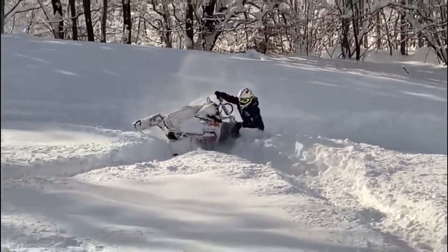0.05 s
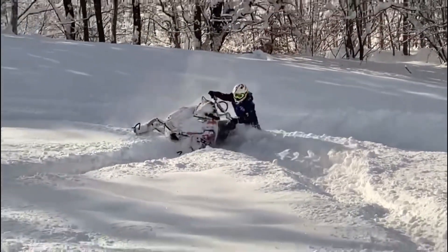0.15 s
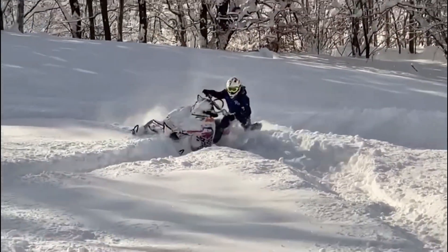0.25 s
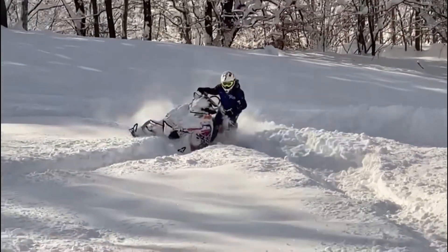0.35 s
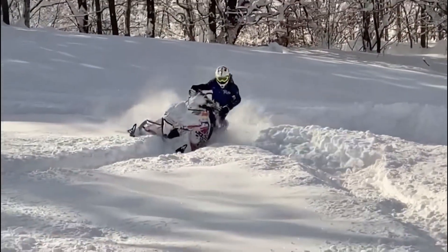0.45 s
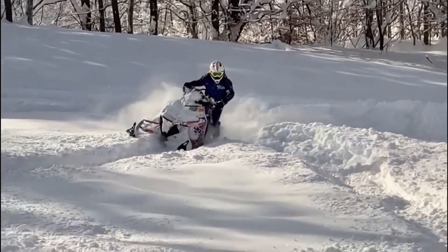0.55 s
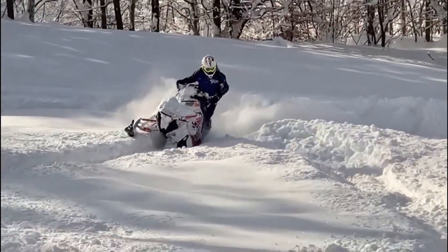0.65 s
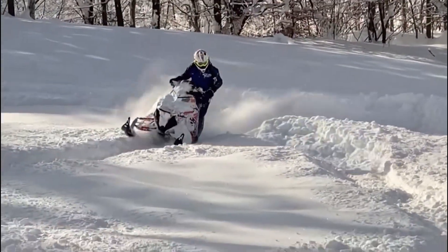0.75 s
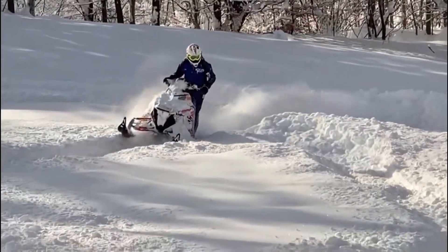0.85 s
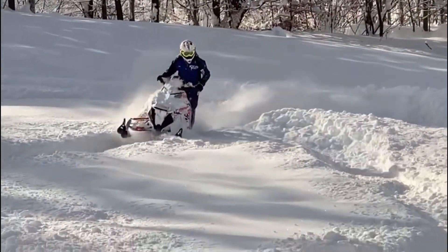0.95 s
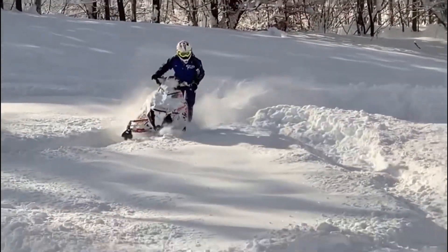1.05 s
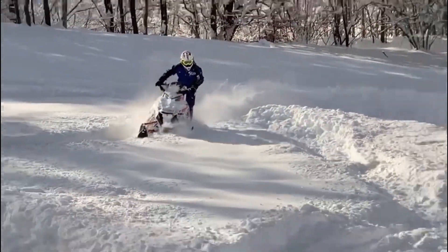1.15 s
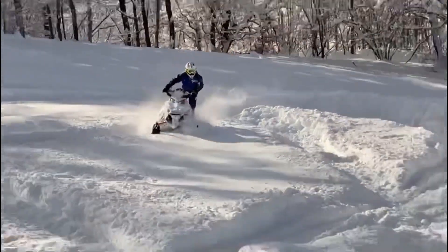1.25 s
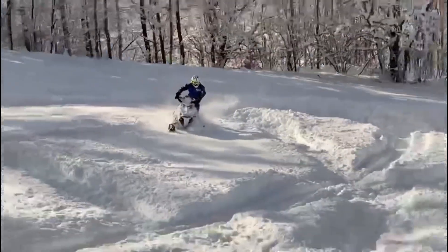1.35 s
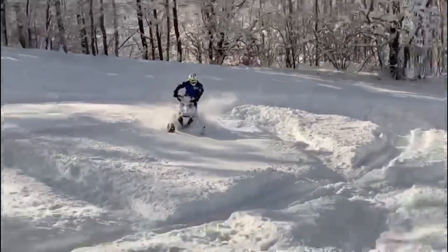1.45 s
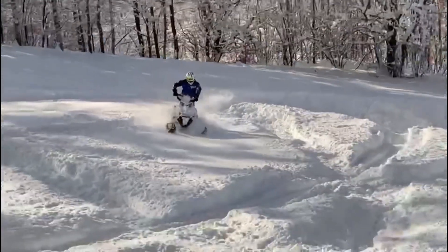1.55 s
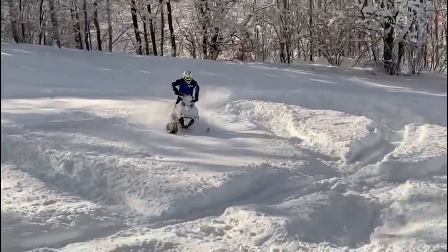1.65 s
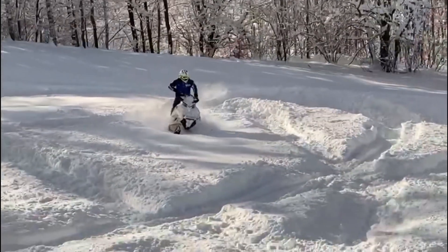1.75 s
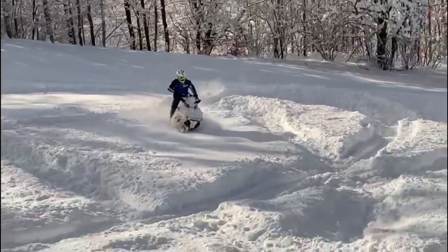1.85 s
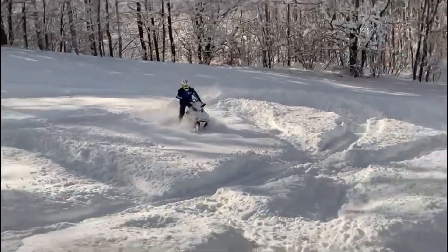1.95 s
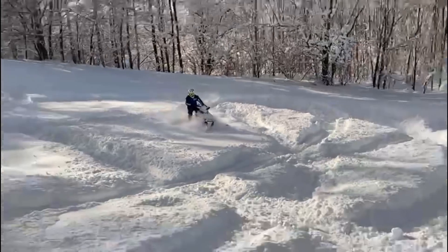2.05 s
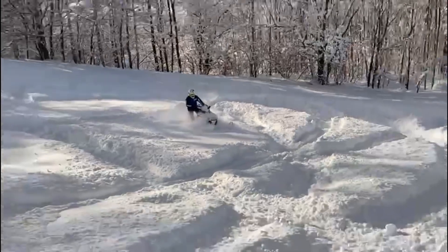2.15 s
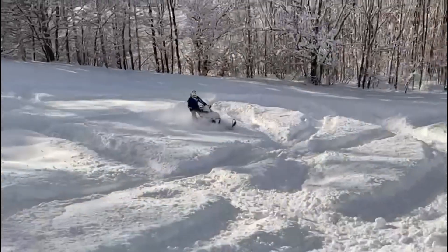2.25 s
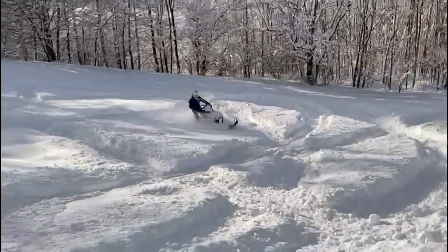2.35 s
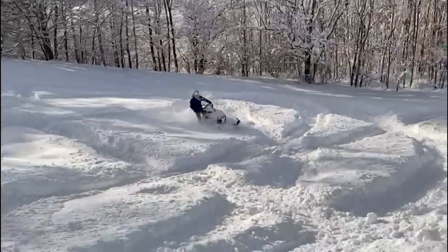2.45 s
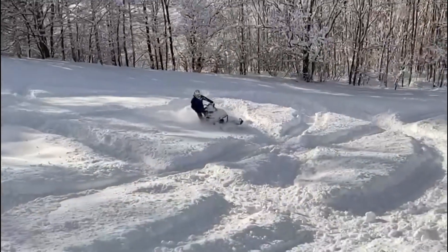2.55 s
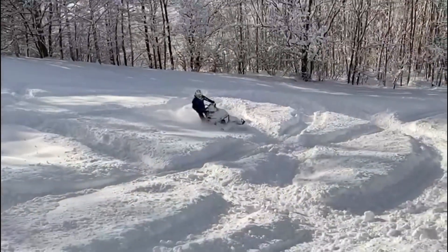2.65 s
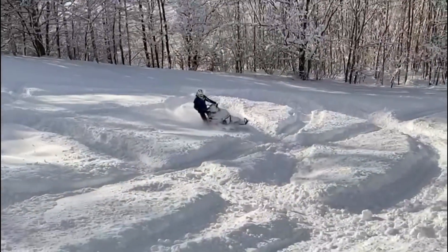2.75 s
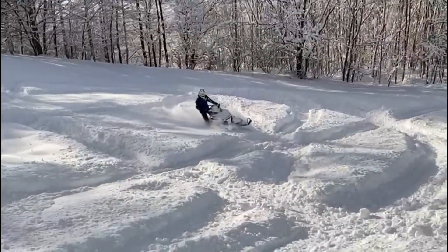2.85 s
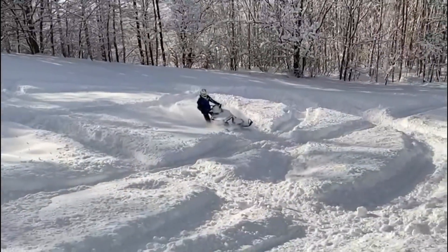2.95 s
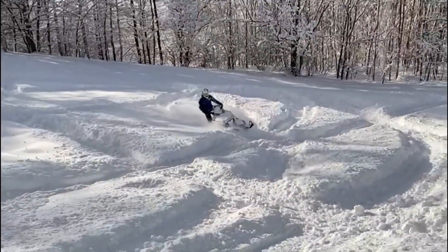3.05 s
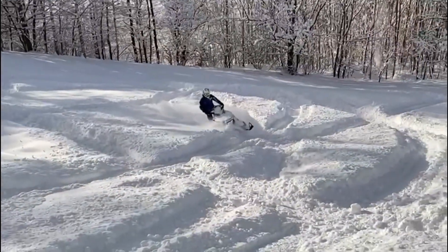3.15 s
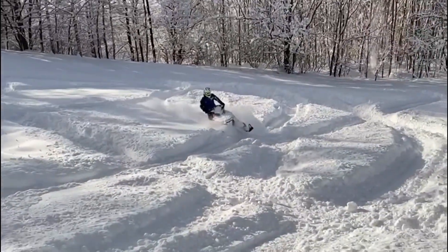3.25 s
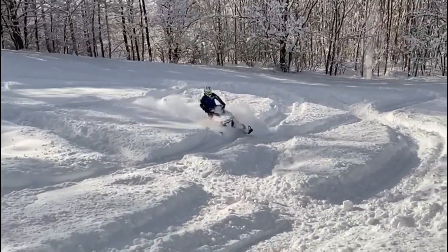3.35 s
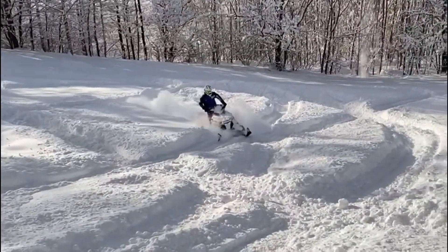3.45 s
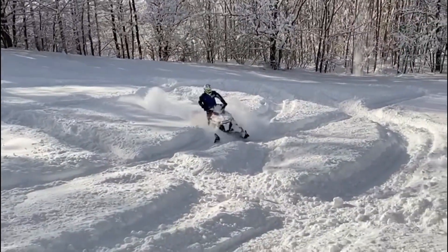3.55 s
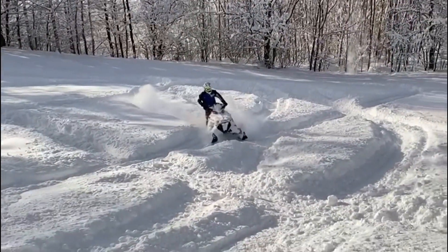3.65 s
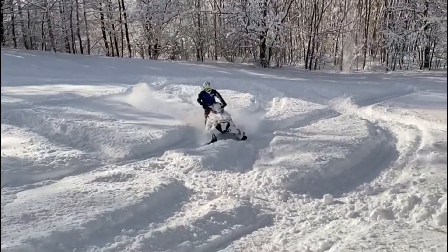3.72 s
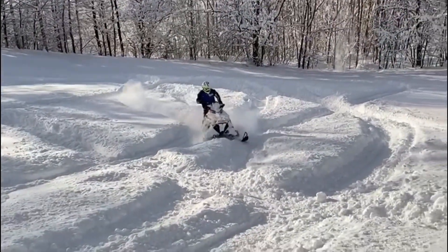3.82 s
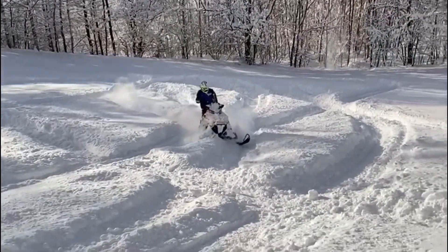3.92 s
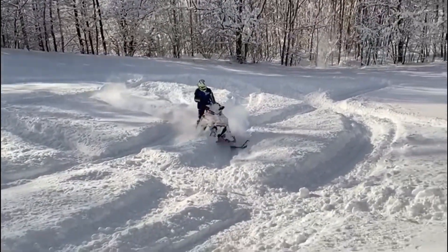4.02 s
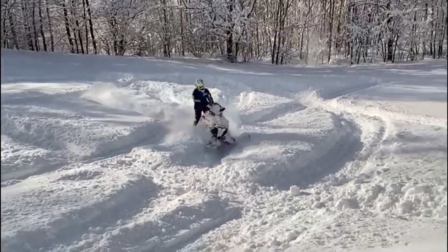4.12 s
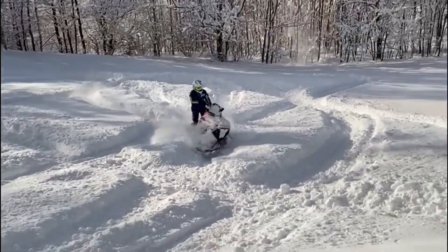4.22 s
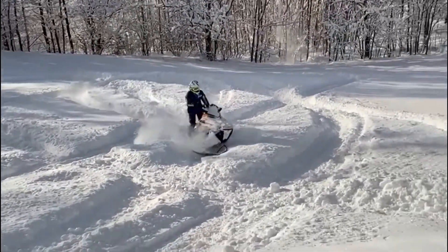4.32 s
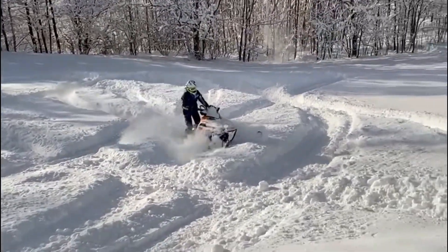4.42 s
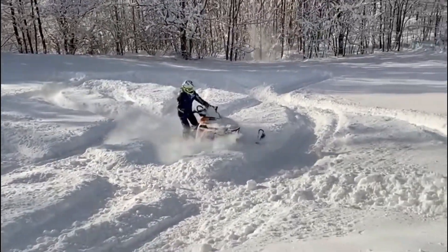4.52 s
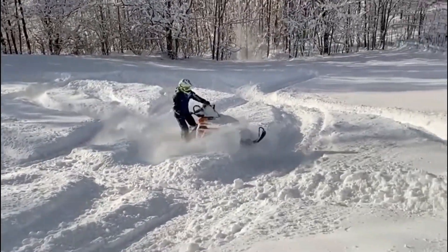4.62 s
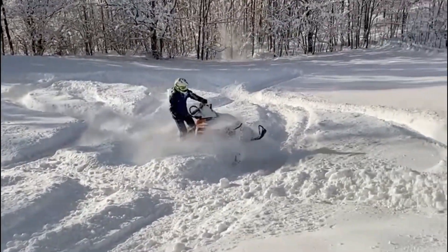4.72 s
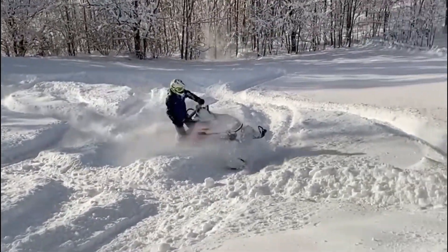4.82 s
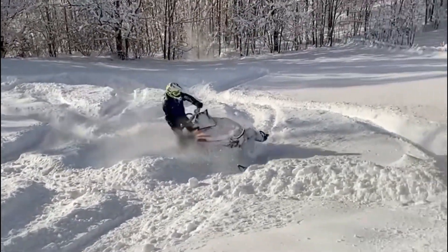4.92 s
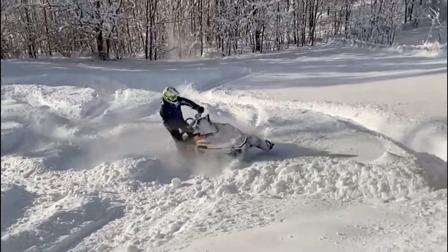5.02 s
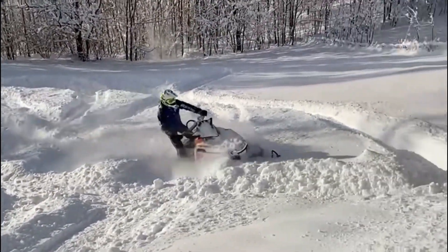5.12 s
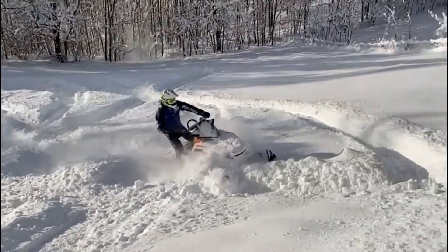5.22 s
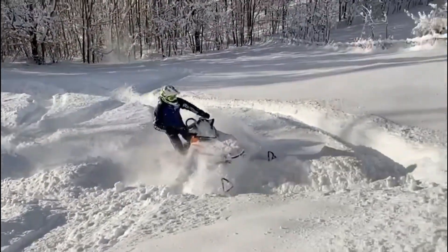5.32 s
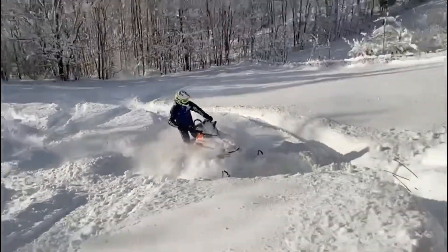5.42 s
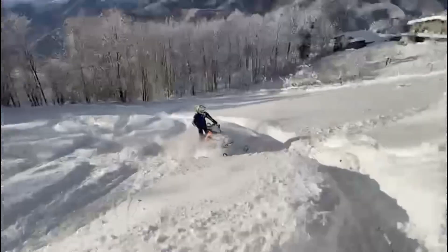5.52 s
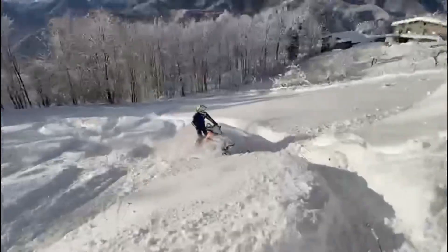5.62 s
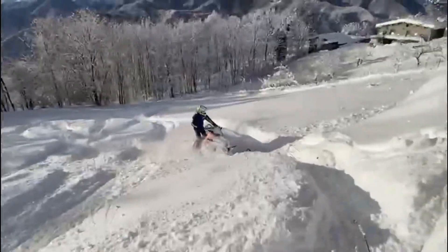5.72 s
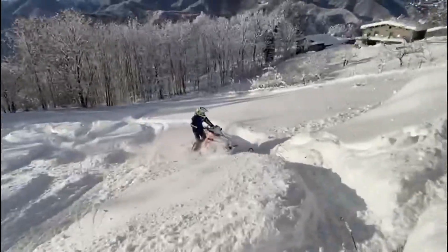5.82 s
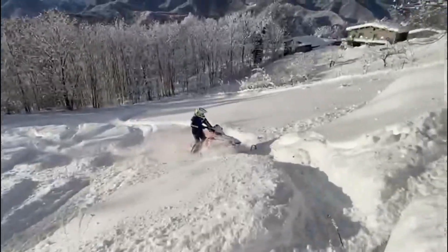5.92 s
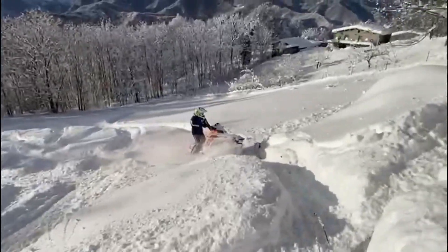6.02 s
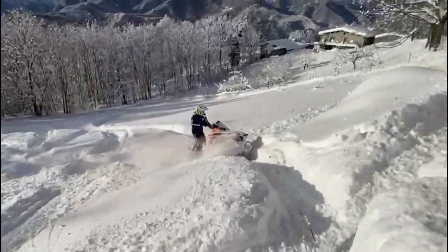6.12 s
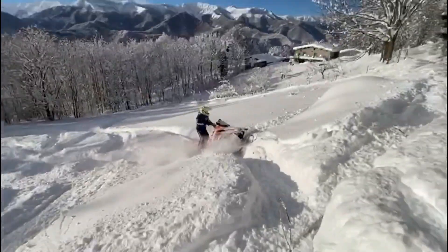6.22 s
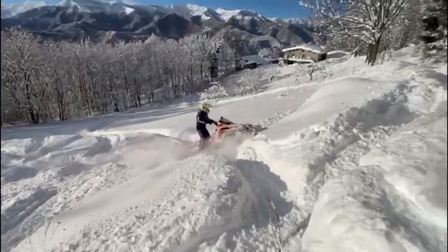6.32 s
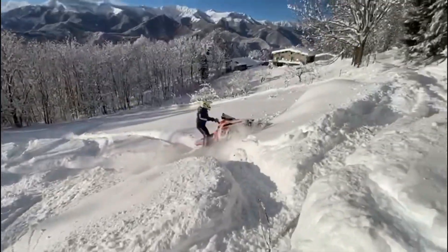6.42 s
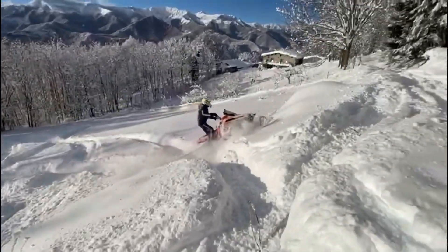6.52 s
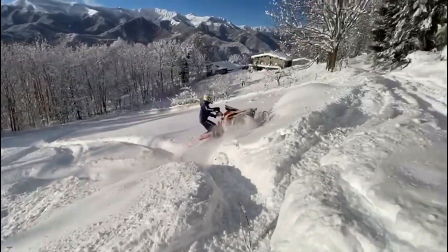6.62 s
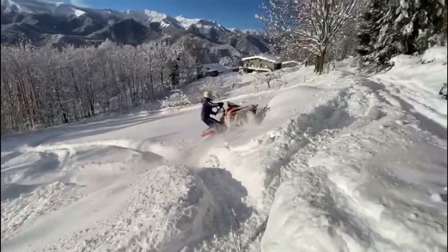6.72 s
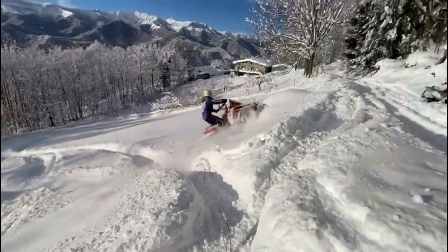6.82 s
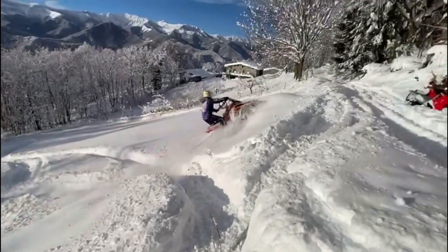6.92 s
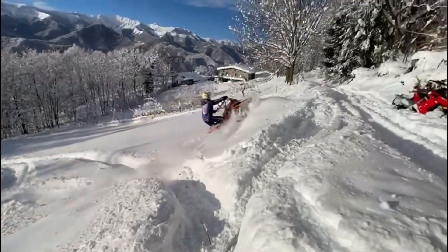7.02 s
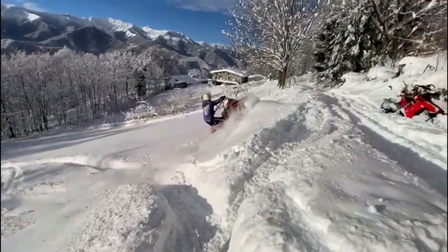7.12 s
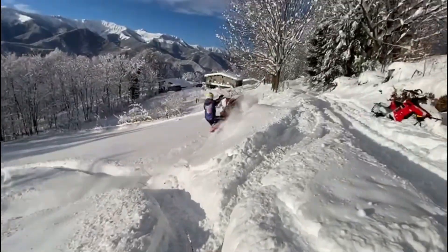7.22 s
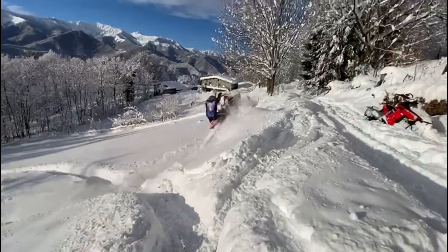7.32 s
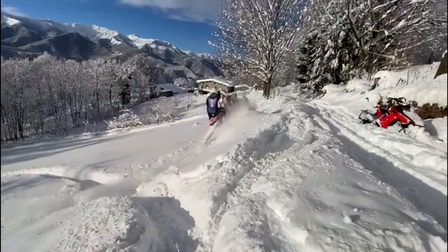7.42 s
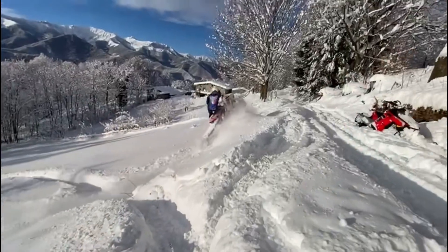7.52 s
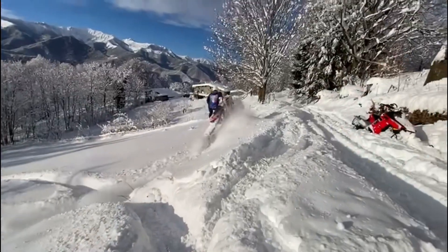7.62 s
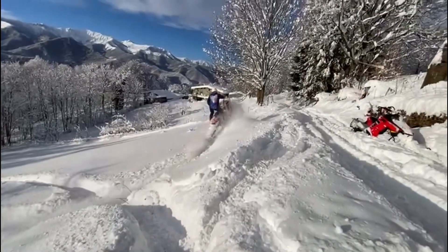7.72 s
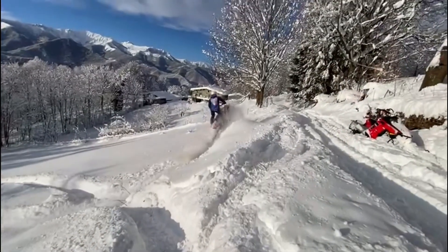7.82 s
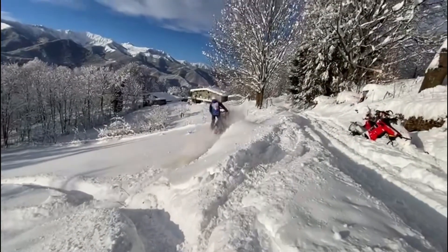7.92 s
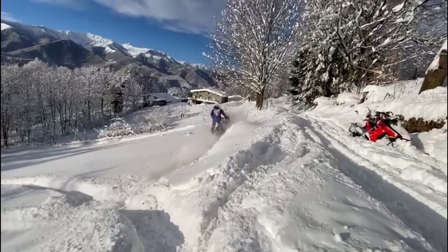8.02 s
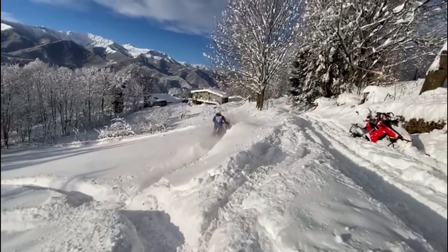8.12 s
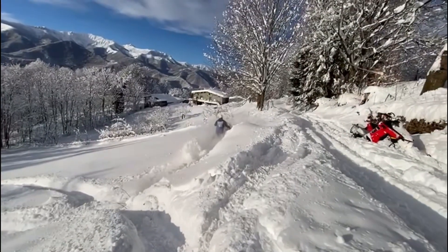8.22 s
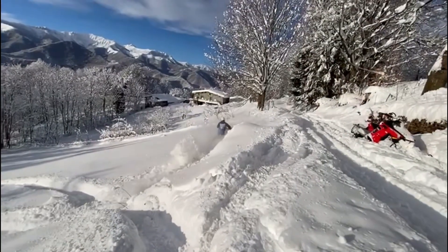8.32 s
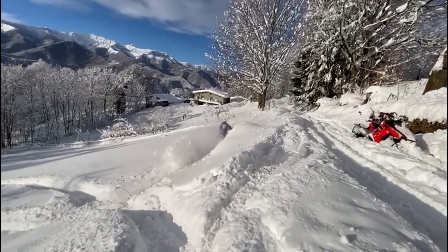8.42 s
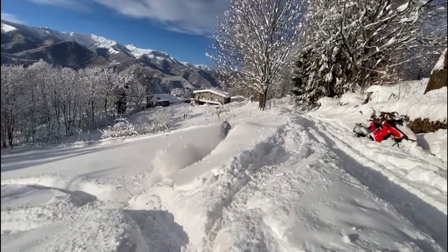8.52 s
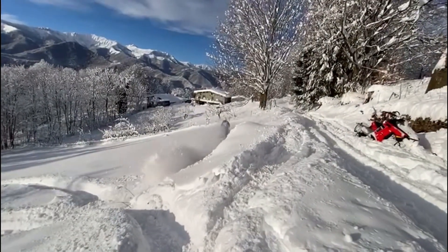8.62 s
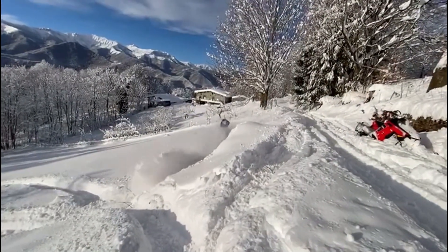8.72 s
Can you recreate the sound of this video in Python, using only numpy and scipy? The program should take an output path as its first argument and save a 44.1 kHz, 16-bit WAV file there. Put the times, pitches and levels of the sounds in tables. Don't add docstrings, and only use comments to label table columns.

```python
import sys
import numpy as np
from scipy import signal
from scipy.fft import rfft, irfft, next_fast_len
from scipy.io import wavfile
from scipy.ndimage import uniform_filter1d, map_coordinates

SR = 44100
rng = np.random.default_rng(int(sys.argv[2]) if len(sys.argv) > 2 else 0)


def nominal_scale(level):
    x = np.asarray(level, float) / 20
    return 10 ** x


def int16_out(signal):
    q = np.round(np.clip(np.atleast_2d(signal).T, -1, 1) * 32767)
    wavfile.write(sys.argv[1], SR, q.astype(np.int16))


N = 386316


def along(points, hz):
    f, v = np.transpose(points)
    return np.interp(np.log(hz + 1), np.log(f + 1), v)


def curves(rows, step=1):
    s, *cols = np.transpose(rows)
    return [np.interp(np.arange(0, N, step) / SR, s, c) for c in cols]


def wobble(rate, step=1):
    knots = rng.standard_normal(4000)
    return map_coordinates(knots, [np.arange(0, N, step) * rate / SR])


def filtered(x, response):
    m = next_fast_len(N + 8192)
    return irfft(rfft(x, m) * response(np.fft.rfftfreq(m, 1 / SR)), m)[..., :N]


def blurred(z, size):
    return uniform_filter1d(uniform_filter1d(z, size[0], axis=-2), size[1], axis=-1)


def noise(spectrum, patchy_db):
    z = signal.stft(rng.standard_normal((2, N)), nperseg=512)[2]
    field = blurred(rng.standard_normal(z.shape[1:]), size=(5, 14))
    x = signal.istft(z * nominal_scale(patchy_db * field / field.std()), nperseg=512)[1][:, :N]
    ends = [(0.9, -120)] + list(spectrum) + [(13000, -120)]
    x = filtered(x, lambda hz: nominal_scale(along(ends, hz)))
    return x / x.std()


# (frequency [Hz], density [dB per Hz])
BREEZE_SPECTRUM = [(20, 4), (35, 25), (60, -6), (110, -27), (160, -120)]
# (time [s], half length [s], gain [dB])
GUSTS = [
    (1.701, .2, 5),
    (4.195, .3, 2),
    (5.25, .25, 2),
    (6.7, .3, 3),
]


def breeze():
    t = np.arange(N) / SR
    gust_db = sum(db * np.exp(-((t - s) / half) ** 2) for s, half, db in GUSTS)
    level_db = -68 + gust_db + 3 * np.array([wobble(3), wobble(3)])
    return nominal_scale(level_db) * noise(BREEZE_SPECTRUM, patchy_db=2.0)


# (time [s], frequency [Hz], level [dB], decay time t60 [s])
BODY_THUMP = (1.681, 78, -29, .05)


def thump():
    s, hz, db, t60 = BODY_THUMP
    t = np.maximum(np.arange(N) / SR - s, 0)
    return nominal_scale(db - 60 * t / t60) * np.sin(2 * np.pi * hz * t)


# (time [s], level [dB])
RIDGE_ECHO = [(0, -60), (7.6, -60), (8, -15), (8.15, -24), (8.3, -12), (8.5, -11), (8.76, -22)]


def hill(x):
    t = np.arange(SR) / SR
    build_up = np.clip((t - .06) / 0.21, 0, 1)
    tail = rng.standard_normal((2, SR)) * nominal_scale(-60 * t / 0.94) * build_up
    trees = nominal_scale(-18) * signal.fftconvolve(x[None], tail / np.linalg.norm(tail[0]), axes=1)[:, :N]
    delayed = np.pad(x, (round(.7 * SR), 0))[:N]
    ridge = nominal_scale(curves(RIDGE_ECHO)[0] + 2.5 * wobble(12)) * delayed
    trees = filtered(trees, lambda hz: 1 / (1 + (hz / 600) ** 2))
    return trees + filtered(ridge, lambda hz: [[1], [0]] / (1 + (hz / 1100) ** 2))


# (time [s], striking rate [Hz], level [dB])
LUG_RATE = [
    (7.5, 154.3, -88),
    (7.8, 192, -47),
    (8.04, 165.8, -41),
    (8.17, 139, -45),
    (8.3, 93.4, -52),
]


def lugs():
    hz, db = curves(LUG_RATE)
    return nominal_scale(db + 2.2 * wobble(24)) * np.sin(2 * np.pi * np.cumsum(hz) / SR + .5 * wobble(23))


# (frequency [Hz], density [dB per Hz])
RUMBLE_SPECTRUM = [(13, -81), (22, -32), (59, -15), (108, -11.5), (134, -20), (200, -10), (260, -7),
                   (440, -120)]
ROAR_SPECTRUM = [(150, -26), (300, -2.5), (700, -2.5), (1500, -0.5), (1850, -1), (2080, -5), (2500, -5.5),
                 (3500, -14), (5500, -19.5), (8000, -32)]
HISS_SPECTRUM = [(3000, 5.5), (4500, 2), (6500, -2), (8000, 5.5), (10000, -10), (11500, -11)]
# (time [s], boom [dB], octave [dB])
LOAD = [(0, -30.5, 0.5), (.32, -41.5, 5.5), (.7, -37.5, 0.5), (1.1, -32, 6), (1.25, -33, 5),
        (1.5, -39.5, 1.5), (1.7, -37.5, -5), (2, -35.5, 3.5), (2.95, -39.5, -6), (3.3, -37.5, -5),
        (3.68, -24.5, 7), (4.1, -25.5, -1), (4.39, -29, 4), (4.68, -25, 6.5), (5.05, -30.5, -2),
        (5.18, -15.5, 8), (5.32, -26.5, -1), (5.55, -19, 1.5), (5.95, -16.5, 0.5), (6.22, -28.5, -9.5),
        (6.78, -29.5, 5), (7.35, -23.5, -3), (7.81, -38, 12), (8.15, -37.5, 5.5), (8.45, -48, -2),
        (8.76, -73, 5)]
# (time [s], spray [dB], dig [dB])
SPRAY = [(0, -55.5, 10), (.22, -52.5, 6), (.7, -58.5, 4), (1.5, -60.5, 4), (1.93, -54, -2),
         (2.66, -52, 6.5), (3.679, -47.5, 4.5), (4.39, -53.5, 6.5), (4.66, -42.5, 8), (4.95, -40.5, 9.5),
         (5.1, -40, 7), (5.23, -39.5, 13.5), (5.36, -44.5, 7.5), (5.56, -35.5, 10), (5.9, -33.5, 7),
         (6.1, -34.5, 11.5), (6.3, -48, 11), (6.61, -43, 5), (7.3, -42.5, -0.5), (7.55, -42.5, -6),
         (8.171, -44.5, 11.5), (8.76, -59.5, -29.5)]
# (time [s], gain [dB])
ROAR_GAIN = [(0, -1), (.55, -3), (.8, -1), (1.2, 0), (1.7, 0), (2, -2), (2.3, -3.5), (3.6, -3.5), (4, -1.5),
             (5.3, -1.5), (5.5, -3.5), (6.3, -3.5), (6.7, -1.5), (7.3, 0), (7.9, 0), (8.12, -5), (8.3, -2),
             (8.65, -5)]
# (time [s], clear share [0-1])
CLEAR = [(0, .8), (.09, .6), (.2, 0), (.77, 0), (.8, 1), (1.13, 1), (1.17, 0), (4.2, 0), (4.28, 1),
         (4.35, 1), (4.4, 0), (6.05, 0), (6.15, .3), (6.4, 0), (6.6, .3), (7.2, .4), (7.4, 1), (7.85, .8),
         (8.15, .6), (8.25, .2)]
# (time [s], level [dB])
POPS = [
    (.8, -33),
    (.915, -31),
    (.96, -30),
    (4.185, -31),
    (4.225, -33),
    (7.388, -31),
    (7.46, -32),
    (7.55, -36),
    (8.02, -44),
]


def track(phase):
    (load_db, _), (spray_db, dig_db) = curves(LOAD), curves(SPRAY)
    (clear,), (roar_gain_db,) = curves(CLEAR), curves(ROAR_GAIN)
    sag, lift_db = speed()[1], barks()[0]

    rumble_db = -42.0 + 0.35 * (load_db + 22.5) + 0.38 * (spray_db + 44.0) + .5 * dig_db
    rumble_db -= .06 * sag
    rumble = nominal_scale(rumble_db + 1.4 * wobble(9.7)) * noise(RUMBLE_SPECTRUM, patchy_db=1.3)

    roar_db = -36 + 0.57 * (spray_db + 49.5) + 0.41 * lift_db + 0.28 * dig_db - 0.094 * sag
    roar_db += roar_gain_db - 3 * clear
    puff = 1 + 0.043 * np.cos(phase) + 0.14 * np.cos(phase / 2)
    gas = noise(ROAR_SPECTRUM, patchy_db=1.1)
    dull = filtered(gas, lambda hz: 1 / (1 + (hz / 1400) ** 4))
    churned = gas - np.maximum(.8 * clear, lift_db / 45) * (gas - dull)
    roar = nominal_scale(roar_db - 2.5 + .9 * wobble(20)) * puff * churned

    t = np.arange(N) / SR
    pops = sum(nominal_scale(db) * np.exp(-((t - s) / .016) ** 2) for s, db in POPS)
    bursts = pops * filtered(gas, lambda hz: 1 + (hz / 4500) ** 2 * (hz < 7500))

    hiss_db = spray_db + 0.55 * lift_db * clear - 0.17 * sag
    hiss = nominal_scale(hiss_db + 5.5 + 1.5 * wobble(9)) * (1 + 0.1 * np.cos(phase))
    hiss = hiss * noise(HISS_SPECTRUM, patchy_db=2.0)
    return rumble + roar + bursts + hiss


# (time [s], rate [Hz])
HELD_RATE = [(0, 253.7), (.5, 256.5), (.8, 257.5), (1.1, 260.4), (1.3, 231.1), (2.07, 241.7), (2.52, 255.7),
             (4.17, 253.9), (4.42, 249), (4.68, 250.2), (5.07, 245.9), (5.72, 249.8), (6.45, 248),
             (6.65, 251.8), (7.41, 250.9), (7.6, 256.9), (7.88, 255), (8.17, 236.1)]
# (start [s], lowest point [s], lowest rate [Hz], recovery [s])
SAGS = [
    (0.167, 0.315, 250.5, 0.17),
    (1.129, 1.391, 187, 0.12),
    (1.621, 1.742, 194, 0.15),
    (4.709, 4.824, 233.5, 0.57),
    (5.091, 5.289, 156.4, 0.19),
    (5.737, 5.836, 242, 0.2),
    (6.721, 7.177, 240, 0.12),
    (8.194, 8.414, 148.2, 0.18),
]


def speed():
    fall_power, rise_power = 1.9, 1.7
    inertia = round(.045 * SR)
    held, = curves(HELD_RATE)
    hz, t = held, np.arange(N) / SR
    for start, low, low_hz, back in SAGS:
        fall = 1 - (1 - np.clip((t - start) / (low - start), 0, 1)) ** fall_power
        recovery = np.exp(-(np.maximum(t - low, 0) / back) ** rise_power)
        hz = hz - (np.interp(low, t, hz) - low_hz) * fall * recovery
    hz = uniform_filter1d(hz, size=inertia)
    climbing = uniform_filter1d(np.clip(np.gradient(hz) * SR / 250, 0, 1), size=inertia)
    return hz, np.maximum(held - hz, 0) * (1 - .6 * climbing)


def crank():
    flutter = .01 * wobble(90) + .035 * wobble(20)
    return 2 * np.pi * np.cumsum(speed()[0]) / SR + flutter


# (time [s], hold [s], lift [dB], outlet resonance [Hz], share reaching the boom [0-1])
BARKS = [(0, 0.065, 13, 825, 0), (0.093, 0.03, 9.5, 890, 0.63), (0.184, 0.018, 7.5, 830, 0.6),
         (0.813, 0.072, 24, 967, 0.45), (0.862, 0.12, 26, 1000, 0.3), (1.002, 0.14, 22, 1090, 0.06),
         (1.547, 0.11, 4.5, 1140, 1), (3.713, 0.15, 8.5, 760, 0), (3.812, 0.07, 22.5, 754, 0.1),
         (3.934, 0.022, 8, 690, 0.22), (4.153, 0.071, 23.5, 920, 0.2), (4.24, 0.066, 17, 1000, 0.18),
         (4.763, 0.16, 12.5, 1120, 0.98), (5.474, 0.12, 7.5, 1300, 0.23), (6.103, 0.12, 12.5, 735, 0.83),
         (6.378, 0.062, 4.5, 902, 0.74), (6.652, 0.047, 4.5, 851, 0.02), (6.887, 0.42, 0, 774.4, 0.23),
         (7.431, 0.026, 9.5, 730, 0.25), (7.476, 0.18, 7.5, 1106, 0.2), (8.656, 0.23, 27.5, 990, 0.97)]
# (time [s], half length [s], loss [dB])
SMOTHERS = [
    (.072, 0.011, 4),
    (0.15, 0.03, 6),
    (0.245, 0.018, 6),
    (.37, 0.017, 3),
    (3.905, 0.0099, 4),
    (4.872, 0.013, 5),
    (5.01, .015, 2.5),
    (7.365, 0.014, -2.5),
    (7.487, 0.011, -0.5),
    (7.569, 0.014, 2.5),
]
# (time [s], buried outlet [Hz], cowl resonance [Hz], cowl gain [dB],
# unevenness of the cylinders [dB])
COWL = [(0, 915, 2320, 9.5, -14), (.5, 980, 2210, 13.5, -10), (1.1, 950, 2260, -3.5, -13),
        (1.5, 1060, 1482, 16, -6), (2.3, 1030, 1440, 3.5, 1), (2.75, 989.4, 1810, 4.5, 3),
        (3.3, 989, 1780, -7, -8), (3.45, 975, 2420, 16, -3), (3.85, 856, 2345, -10, -10),
        (4.1, 866.4, 2300, 5, -2), (4.33, 870, 2320, 5.5, -18), (4.6, 1079, 1520, -2, 9),
        (4.85, 1048, 1687, 27, 2), (4.98, 1049, 1680, 14, 8), (5.07, 996, 1844, 22, 10),
        (5.2, 900, 1851, 9, -18), (5.35, 884, 1810, 16, -2), (5.6, 1020, 1812, 12, -3),
        (6.15, 801, 2000, 10, -12), (6.6, 830, 1754, 7.5, 2), (7.2, 870, 1940, 11.5, -1),
        (7.7, 950.3, 1960, 21, 21), (8.05, 800, 1871, 17, -11), (8.45, 873, 1798, 7, -8),
        (8.7, 936, 1770, 7, -9)]


def barks():
    open_s, close_s, droop_per_s = 0.086, 0.12, 0.8
    t = np.arange(N) / SR
    s, hold, db, hz, share = np.transpose(BARKS)[..., None]
    shape = np.clip(np.minimum(1 + (t - s) / open_s, 1 - (t - s - hold) / close_s), 0, 1)
    shape = shape * (1 - droop_per_s * np.clip(t - s, 0, hold))
    rest_hz = curves(COWL)[0] * np.exp(.06 * wobble(5.9))
    weight = shape.sum(axis=0)
    outlet_hz = rest_hz * np.maximum(1 - weight, 0) + (shape * hz).sum(axis=0)
    outlet_hz = outlet_hz / np.maximum(weight, 1)
    loss_db = sum(loss * np.exp(-((t - at) / half) ** 2) for at, half, loss in SMOTHERS)
    return (shape * db).max(axis=0) - loss_db, (shape * db * share).max(axis=0), outlet_hz


# (frequency [Hz], level [dB])
PIPE = [(300, 67), (750, 2), (1400, 1), (1800, -3.5), (2050, -9.5), (2310, -8), (2570, -11.5), (2900, -7.5),
        (3450, -15.5), (4100, -16), (4700, -26.5), (6200, -23.5), (7600, -45)]
# (frequency [Hz], level [dB])
MISMATCH = [(120, -9.5), (380, -10.5), (900, -12), (1500, -12), (3000, -18), (7000, -31)]
# (time [s], blast [dB], edge over it [dB])
OUTLET = [(0, -32.5, -9.5), (.24, -32.5, -4.5), (.7, -42.5, -1.5), (1.5, -40.5, -19), (2.3, -44, 5),
          (2.66, -42.5, 7.5), (3.65, -44, 0.5), (4.07, -35, -2), (4.42, -41.5, -4), (4.9, -31.5, -1),
          (5.2, -29, -9), (5.4, -29, -1), (5.7, -25.5, 4), (6, -24.5, -9), (6.54, -31, -3),
          (6.949, -27, 2.5), (7.27, -25.5, -1.5), (7.75, -33, 5), (8.1, -34, -3.5), (8.45, -51, 14),
          (8.76, -78.5, 5)]
STEP = 64


def exhaust(phase):
    hz, sag, lift_db, push_db, outlet_hz = np.array([*speed(), *barks()])[:, ::STEP]
    load_db, octave_db = curves(LOAD, step=STEP)
    blast_db, edge_db = curves(OUTLET, step=STEP)
    spray_db, dig_db = curves(SPRAY, step=STEP)
    clear, = curves(CLEAR, step=STEP)
    _, cowl_hz, cowl_db, uneven_db = curves(COWL, step=STEP)

    bark_db = blast_db + lift_db - 0.28 * sag
    rasp_db = blast_db + edge_db + (0.69 + 0.33 * clear) * lift_db - 0.93 * sag
    buried = np.clip((-27 - bark_db) / 8, 0, 1)
    slowing = np.clip(-np.gradient(hz) * SR / STEP / 300 - .4, 0, 1)
    slowing = uniform_filter1d(slowing, size=45)
    shut_db = 12 * slowing + np.clip((190 - hz) / 4, 0, 8)
    stall_db = 14 * slowing
    boom_db = load_db + push_db - 7 * slowing - 0.13 * sag
    second_db = .55 * boom_db + .45 * bark_db + octave_db - 2.5 - 14 * slowing
    second_db += 1.5 * wobble(6, step=STEP)
    odd_db = -40.0 + 0.087 * (spray_db + 52.0) + 0.32 * (boom_db + 28.0) + 0.87 * dig_db
    odd_db += 2.34 * wobble(4.6, step=STEP)
    shake = .015 * buried * wobble(70, step=STEP)

    out, coarse, fine = np.zeros(N), np.arange(0, N, STEP), np.arange(N)
    for k in np.arange(1, 77) / 2:
        f, whole = k * hz, k % 1 == 0
        high = np.clip((f - 1250) / 400, 0, 1)
        if k == 1:
            db = boom_db
        elif k == 2:
            db = second_db
        elif whole:
            outlet_db = np.maximum(-9 * (np.log2(f / outlet_hz) / .5) ** 2, -12)
            db = (1 - high) * (bark_db + outlet_db) + high * (rasp_db - 3.0) + along(PIPE, f) - shut_db
            db += 9 * (clear - .35) * np.clip(np.log2(f / 2200), 0, 1.5)
            db += 0.37 * lift_db * np.exp(-((f - 2310) / 250) ** 2)
            db += 0.14 * lift_db * np.exp(-((f - 2930) / 220) ** 2)
            db += cowl_db * np.exp(-((f - cowl_hz) / 81) ** 2) - 4.5
        else:
            db = odd_db + 0.15 * (rasp_db + 21.0) * high + along(MISMATCH, f) - shut_db - 5 * clear * high
            if k == .5:
                db = db + np.minimum(uneven_db, 0) - 2.5 - stall_db
            elif k == 1.5:
                db = db + uneven_db
        if k > 2:
            db = db + 1.1 * wobble(3, step=STEP) + (1.8 + 1.2 * buried - clear) * wobble(30, step=STEP)
        db = db + .8 * wobble(30, step=STEP)
        lag = 2 * np.pi * 0.001547 * 900 * (1 - np.exp(-f / 900))
        lag += np.pi if k > 1 else .6
        lag += (buried if whole else 1) * 2.5 * wobble(1.5, step=STEP)
        lag += k * shake
        out -= np.interp(fine, coarse, nominal_scale(db + 3.0)) * np.cos(k * phase - np.interp(fine, coarse, lag))
    return out


# (time [s], spacing of the crests [Hz], depth [dB])
MIRROR = [(0, 1080, -1), (.5, 1060, 0), (1.2, 1140, 0), (2.2, 960, -1), (3, 900, 2.5), (3.7, 900, 0),
          (4.4, 1125, 1), (4.9, 1350, 1.5), (5.35, 1260, -1), (5.6, 1380, 2), (5.82, 2250, 1.5),
          (5.95, 2070, 3.5), (6.1, 1660, 1), (6.3, 1600, 1), (6.6, 1720, 1), (7.2, 2160, -0.5),
          (7.6, 2270, 0), (8.2, 2120, 2.5)]


def snow_mirror(hz, t, shape):
    s, spacing_hz, depth_db = np.transpose(MIRROR)
    hz = hz[:, None]
    crests = np.cos(2 * np.pi * hz / np.interp(t, s, spacing_hz))
    crests = crests * np.clip(hz / 1500 - .5, 0, 1) * np.clip(2 - hz / 3500, .3, 1)
    dapple = blurred(blurred(rng.standard_normal(shape), size=(8, 5)), size=(8, 5))
    clear = np.interp(t, *np.transpose(CLEAR))
    dapple = 1.6 * (.3 + .7 * clear) * dapple / dapple.std() * np.clip(hz / 600 - 1, 0, 1)
    return np.interp(t, s, depth_db) * crests + dapple


# (frequency [Hz], left minus right [dB])
TILT = [
    [(60, 0), (340, 0), (450, -3), (600, -4), (750, -11), (950, -6), (1250, -9), (1500, -1), (2000, 0), (11000, 0)],
    [(60, 0), (250, 2.5), (430, -6), (600, -7), (950, -13), (1400, -3), (1700, 6), (2200, 6), (3500, -2), (6000, -4), (11000, -2)],
    [(60, 0), (250, 2.5), (430, -4), (600, -5), (750, -16), (1200, -11), (1900, 3), (3000, -2), (4200, -7), (11000, -1)],
    [(60, 0), (250, 2.5), (430, -4), (600, -5), (750, -14), (1200, -9), (1900, 2), (3000, -2), (4200, -3), (11000, -1)],
]
# (frequency [Hz], left leads by [rad])
LEAD = [
    [(0, 0), (200, -.3), (600, -.6), (750, 0), (4900, 0), (5500, -1.2), (5750, -3.14), (6000, -5.2), (6800, -6.3), (7400, -9.42), (8750, -9.42), (9700, -7), (11000, -6.3)],
    [(0, 0), (200, -.6), (600, -1.6), (800, -3.1), (1000, -5.3), (1380, -7.1), (1750, -10.6), (2100, -11.1), (2500, -10.6), (3300, -8), (4500, -10.4), (5200, -12.2), (6800, -13), (7700, -15.7), (8400, -15.7), (11000, -18.8)],
    [(0, 0), (200, -.6), (600, -1.6), (800, -2.6), (1050, -1.2), (1300, -.6), (2300, -1.2), (3500, -1.7), (4800, -2.9), (6600, -6.8), (7600, -9.4), (8400, -9.4), (11000, -12.6)],
    [(0, 0), (200, -.6), (600, -1.6), (800, -2.6), (1050, -1.2), (1300, 0), (2100, -.4), (3100, -1.8), (3800, -3.1), (5300, -3.2), (6200, -6.9), (7500, -9.4), (8400, -9.4), (11000, -12.6)],
]
# (time [s], heading number)
HEADING = [(0, 0), (5.36, 0), (5.42, 1), (6.3, 1), (6.5, 2), (6.8, 2.4), (7, 3), (7.33, 3), (7.38, 2)]
# (frequency [Hz], share [0-1])
APART = [(200, 0), (1500, 1), (3000, 0), (6500, 0.3), (9000, 0.1)]
# (frequency [Hz], wander [rad])
DRIFT = [(300, .05), (1200, .4), (2500, .7), (6500, .9), (8000, .5), (11000, .6)]


def ports(near, other):
    hz, t, z = signal.stft(np.array([near, other]), SR, nperseg=1024, noverlap=768)
    z = z * nominal_scale(snow_mirror(hz, t, z.shape[1:]))
    heading = np.interp(t, *np.transpose(HEADING))
    share = [np.clip(1 - abs(heading - k), 0, 1) for k in range(len(TILT))]
    tilt_db = sum(np.outer(along(tilt, hz), part) for tilt, part in zip(TILT, share))
    turns = [np.exp(1j * np.interp(hz, *np.transpose(lead))) for lead in LEAD]
    lead = np.angle(sum(np.outer(turn, part) for turn, part in zip(turns, share)))
    field = blurred(blurred(rng.standard_normal(lead.shape), size=(5, 12)), size=(5, 12))
    turned = np.maximum(1 - share[0] - .2 * share[3], .6 * (hz[:, None] > 5200))
    lead += along(DRIFT, hz)[:, None] * turned * field / field.std()
    loose = along(APART, hz)[:, None] * turned * z[1]
    left = z[0] * nominal_scale(tilt_db / 2) * np.exp(1j * lead) + loose
    right = z[0] * nominal_scale(-tilt_db / 2) - loose
    return signal.istft(np.array([left, right]), SR, nperseg=1024, noverlap=768)[1][:, :N]


# (frequency [Hz], gain [dB])
NARROWING = [(3000, 0.5), (5000, -2.5), (6500, 2.5), (7200, -6.5), (7800, -9), (8500, -13), (9500, 0.5),
             (11000, -11)]


def thinned(x, margin_db):
    sum_difference = np.array([x[0] + x[1], x[0] - x[1]]) / 2
    hz, t, z = signal.stft(sum_difference, SR, nperseg=2048, noverlap=1536)
    hz = hz[:, None]
    power = blurred(abs(z) ** 2, size=(6, 3))
    keep = (power > power[::-1] * nominal_scale(-2 * margin_db)) | (hz < 1500)
    faint = abs(blurred(abs(z) ** 2, size=(1, 2))) / (abs(blurred(power, size=(24, 1))) + 1e-20)
    steepness = .24 * np.clip(hz / 600 - 1, 0, 1)
    keep = keep * np.clip(faint, .01, 1) ** steepness
    mid, side = signal.istft(z * keep, SR, nperseg=2048, noverlap=1536)[1][:, :N]
    side = filtered(side, lambda hz: nominal_scale(along(NARROWING, hz)))
    return np.array([mid + side, mid - side])


def scene():
    phase = crank()
    engine, snow = exhaust(phase), track(phase)
    echo = hill(engine)
    near = engine + lugs() + snow[0] + echo[0]
    other = snow[1] + echo[1]
    return ports(near, other) + thump() + breeze()


def band_limit(x):
    return signal.sosfilt(signal.butter(12, 11930, fs=SR, output="sos"), x)


def record(dry):
    soft = dry / (1 + abs(dry / .9) ** 5) ** (1 / 5)
    return band_limit(thinned(soft, margin_db=10))


dry = scene()
out = record(dry)
int16_out(out)
```